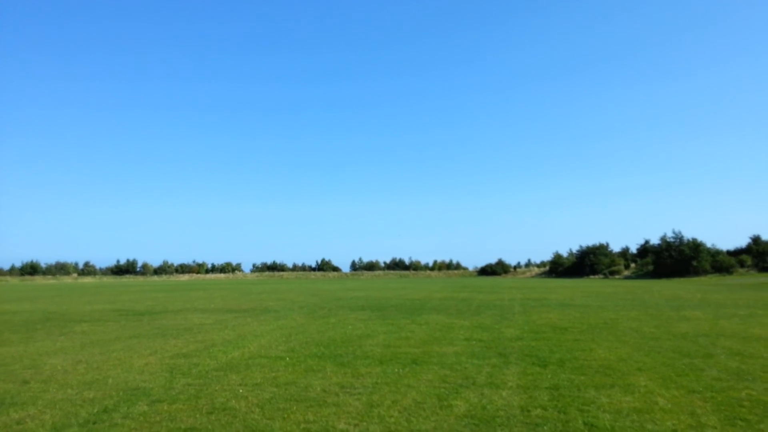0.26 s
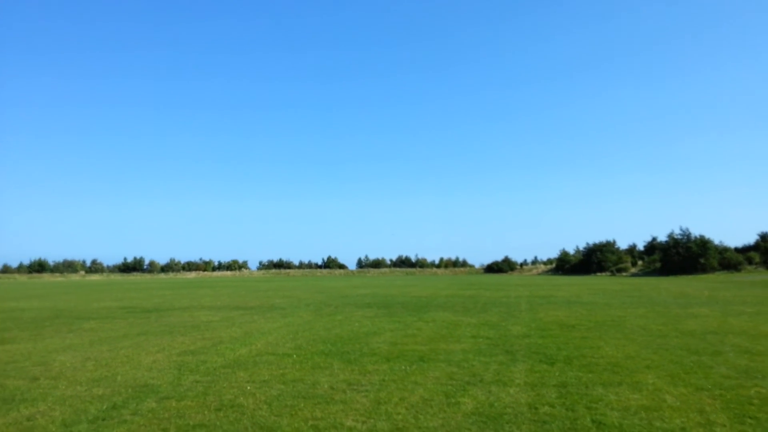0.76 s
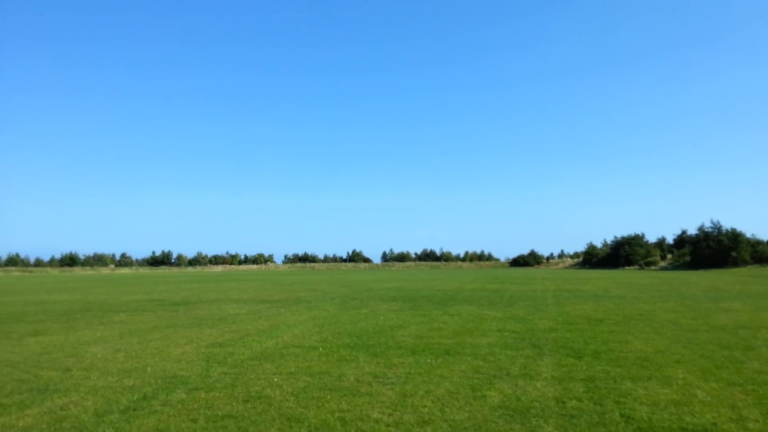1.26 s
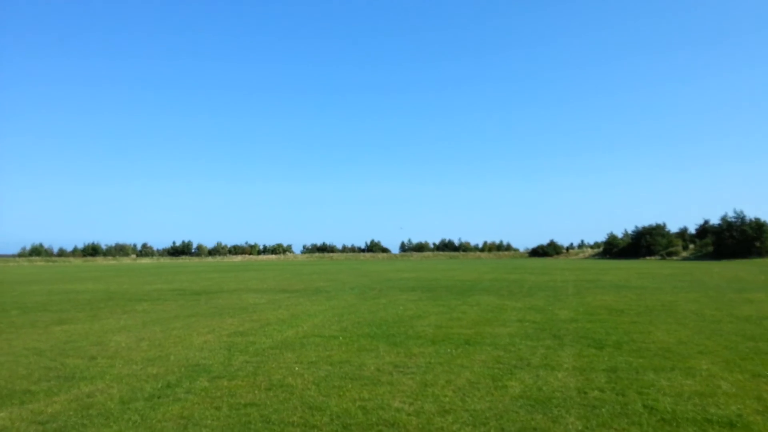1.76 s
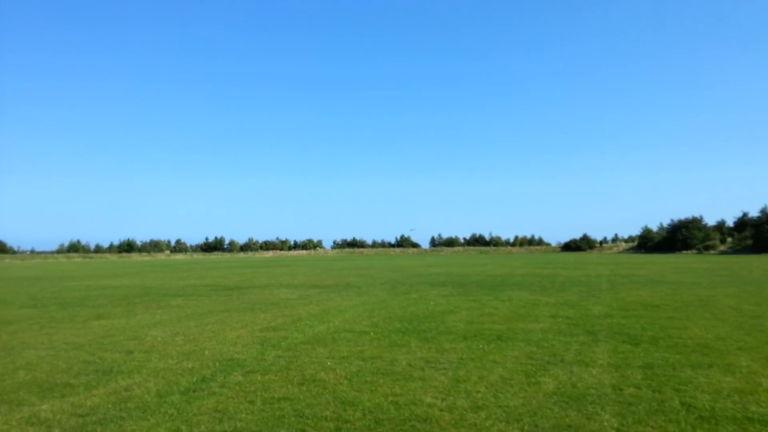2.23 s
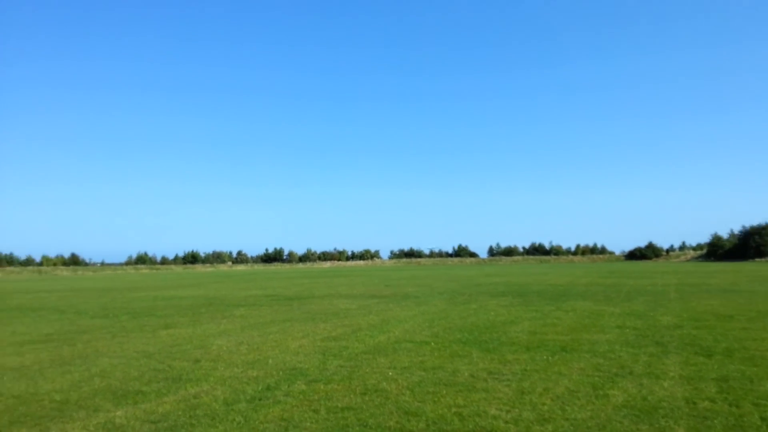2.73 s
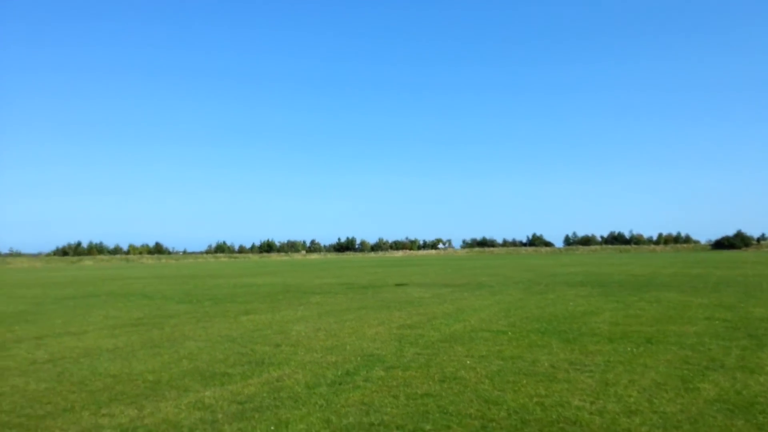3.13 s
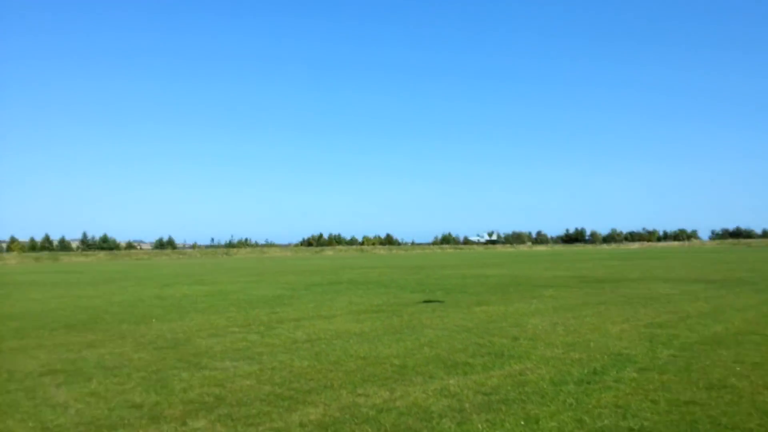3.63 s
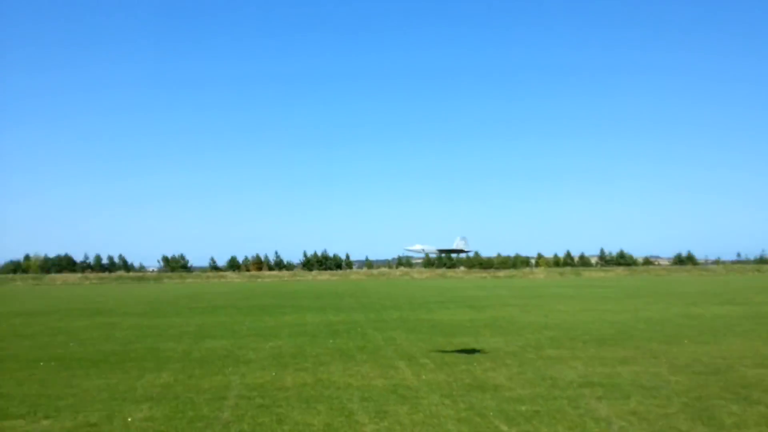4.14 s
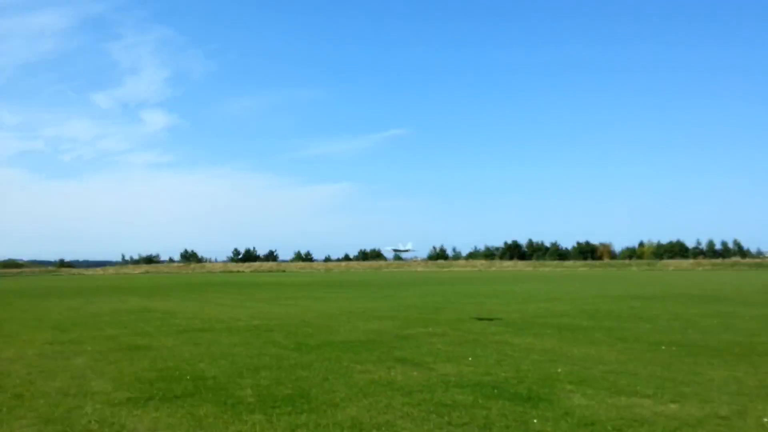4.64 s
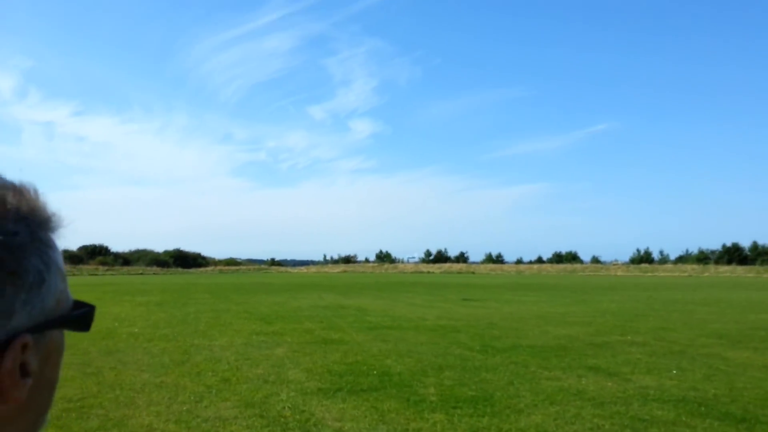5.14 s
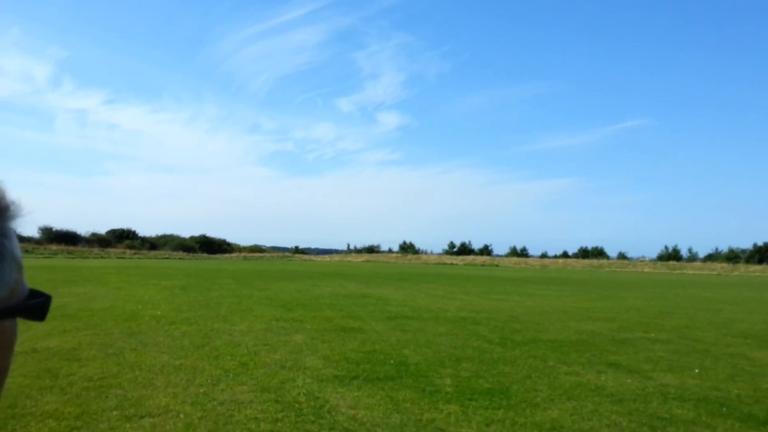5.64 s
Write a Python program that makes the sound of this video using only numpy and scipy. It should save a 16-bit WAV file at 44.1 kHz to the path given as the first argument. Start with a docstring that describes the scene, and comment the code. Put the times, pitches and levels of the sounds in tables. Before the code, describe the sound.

A small ducted-fan jet whines in over an open field, rushes by with airy roar, and departs, beneath buffeting wind.

```python
"""At first gusts slap the two ports of a camera microphone, each by itself, while a breeze blows over a field.
A model jet with an electric ducted fan flies in: the pitch of its whine eases down, then climbs in throttle steps.
It passes low over the grass at about 4.3 s; sines make its whine, coloured noise its intake rush, roar and hiss.
The echo off the ground sweeps a comb of peaks and dips through that noise.
As the jet leaves, its Doppler shift pulls the pitch down and the rumble grows against the wind on the ports."""
import sys
import numpy as np
from scipy import signal
from scipy.fft import rfft, irfft, next_fast_len
from scipy.io import wavfile
from scipy.ndimage import uniform_filter1d

SR = 44100
rng = np.random.default_rng(int(sys.argv[2]) if len(sys.argv) > 2 else 0)


def waveform_to_disk(signal):
    """Save audio, clipped to [-1, 1], as 16-bit WAV at the path in sys.argv[1]."""
    frames = np.transpose(np.atleast_2d(signal))
    scaled = np.clip(frames, -1, 1) * 32767
    samples = np.round(scaled).astype(np.int16)
    wavfile.write(sys.argv[1], SR, samples)


N = 259616

# time of every sample and of every noise frame (s), and the frequencies within a frame
T = np.arange(N) / SR
FRAME_T = np.arange(N // 128 + 5) * 128 / SR
BIN_HZ = np.fft.rfftfreq(512, 1 / SR)[:, None]

# straight pass at steady speed: speed, distance and time of the closest point
SPEED_M_PER_S, CLOSEST_M, CLOSEST_S = 36.65, 19.35, 4.339
SOUND_M_PER_S, MIC_HEIGHT_M = 343, 1.6

# direction of the jet as the camera follows it: (t/s, lag of the left port/ms)
JET_BEARING = [(0, -0.025), (2.2, -0.031), (3.2, -0.039), (3.55, -0.078), (3.97, -0.11), (4.3, -0.048),
               (4.6, -0.036), (4.85, -0.044), (5.2, -0.038), (5.4, 0.0049), (5.89, 0.017)]


def gain_of(db):
    """Turns decibels into a factor."""
    return 10 ** (np.asarray(db) / 20)


def evened(x):
    """Scales a signal to an rms of 1."""
    return x / np.sqrt(np.mean(x ** 2) + 1e-20)


def follow(rows, at, axis=1):
    """Reads one column of a table, joined by straight lines."""
    rows = np.array(rows)
    return np.interp(at, rows[:, 0], rows[:, axis])


def read(points, hz):
    """Reads a spectrum, joined by straight lines on a log-frequency axis."""
    f, value = np.transpose(points)
    return np.interp(np.log(hz + 1), np.log(f), value)


def coloured(x, spectrum):
    """Gives a signal a spectrum, at rms 1."""
    hz = np.fft.rfftfreq(len(x), 1 / SR)
    return evened(irfft(rfft(x) * gain_of(read(spectrum, hz)), len(x)))


def wobble(rate_hz):
    """Random drift of rms 1, up to about the given rate."""
    size = next_fast_len(N)
    hz = np.fft.rfftfreq(size, 1 / SR)
    drift = irfft(rfft(rng.standard_normal(size)) / (1 + (hz / rate_hz) ** 2), size)
    return evened(drift[:N])


def field(level_db=-50.5, shared=0.15):
    """Steady breeze in grass and far trees, with microphone hiss: noise partly the same at both ports."""
    # colour of breeze and hiss together: (f/Hz, level/dB)
    breeze_colour = [(20, -30), (80, -25), (150, -8), (300, 7.5), (800, 8), (1400, 2.5), (2200, -6),
                     (5000, -2.5), (6500, -13), (14500, -16.5)]
    common, *own = [coloured(rng.standard_normal(N), breeze_colour) for _ in range(3)]
    return gain_of(level_db) * evened(shared * common + np.array(own) * .5)


def gusts():
    """Strength of the wind on each port: every gust rises, holds and dies."""
    # gusts over one port, before the shared boost in wind(): (t/s, length/s, level/dB, port 0 left or 1 right)
    gust_list = [(0.028, 0.07, -36, 0), (0.176, 0.16, -36.5, 0), (0.39, 0.046, -34.5, 0),
                 (.47, 0.083, -47, 0), (0.548, 0.097, -40, 0), (0.68, 0.18, -36.5, 0),
                 (0.883, 0.049, -41, 0), (0.961, 0.028, -37.5, 0), (1.008, 0.34, -36, 0),
                 (1.321, 0.015, -35.5, 1), (1.394, 0.09, -38, 0), (1.538, 0.023, -41.5, 1),
                 (1.655, 0.0093, -38.5, 1), (1.77, 0.04, -44.5, 1), (1.877, 0.011, -46, 1),
                 (2.024, 0.014, -40.5, 0), (1.964, 0.15, -46, 1), (2.189, 0.12, -34.5, 0),
                 (2.435, 0.13, -41, 0), (2.475, 0.019, -42, 1), (2.649, 0.087, -42, 0),
                 (2.762, 0.11, -37, 0), (2.93, 0.11, -41.5, 1), (2.972, 0.082, -40.5, 0),
                 (3.122, 0.021, -48, 1), (3.19, 0.15, -59, 0), (3.55, .06, -72, 0), (3.995, 0.019, -37, 1),
                 (4.016, 0.094, -41, 0), (4.194, 0.11, -39, 1), (4.272, 0.052, -42, 0),
                 (4.382, 0.047, -40, 1), (4.418, 0.27, -45.5, 0), (4.744, 0.083, -40.5, 0),
                 (4.855, 0.059, -41, 0), (4.936, 0.077, -47, 0), (5.43, 0.09, -57, 0),
                 (5.616, 0.014, -47, 0), (5.726, 0.027, -54, 0), (5.82, 0.044, -51.5, 0)]
    rise_s, fall_s, lull_db = 0.017, 0.013, -85  # the lull is the wind between gusts
    strength = np.full((2, N), gain_of(lull_db))
    for s, length, db, port in gust_list:
        outside = np.maximum(s - T, 0) / rise_s + np.maximum(T - s - length, 0) / fall_s
        strength[round(port)] += gain_of(db) * np.exp(-outside)
    return strength


def wind(gust_db=3.0, lumpy_db=2.5, crackle_db=3.0, buffet_db=0.0, slap=0.68):
    """Lumpy air noise on each port; a hard eddy is a pressure slap in a short flurry, with its own pitch."""
    # colour of wind on a port, thin in the bass: (f/Hz, level/dB)
    wind_colour = [(20, -48), (70, -50), (100, -47), (140, -27), (200, -13.5), (290, 1), (450, 2.5),
                   (620, -3), (850, -13), (1200, -29.5), (2000, -44), (5000, -64)]
    wind_centre_hz = 457.5
    # colour of the deep rumble under the gusts: (f/Hz, level/dB)
    rumble_colour = [(20, -18), (60, -28), (110, -14), (170, -0.5), (240, 5), (400, -18), (1000, -70)]
    # rumble against the gusts, growing as the camera turns after the jet: (t/s, level/dB)
    rumble_share = [(0, -21), (.7, -24), (2.6, -22), (3.2, -11), (4.2, -15), (4.8, -10.5), (5.7, -3.5)]
    # single hard eddies that strike a port: (t/s, level/dB, length/s, centre f/Hz, port 0 left or 1 right)
    buffets = [(0.004, -26.5, 0.0072, 440, 0), (0.014, -20, 0.0041, 486, 0), (0.055, -22, 0.0062, 580, 0),
               (0.062, -12, 0.0044, 524, 0), (0.077, -14, 0.0064, 490, 0), (0.085, -16.5, 0.0054, 590, 0),
               (0.09, -19, 0.0062, 520, 0), (0.118, -18, 0.0053, 416, 1), (0.144, -27, 0.0049, 480, 1),
               (0.177, -19.5, 0.0022, 507, 0), (0.187, -32, 0.0042, 487, 0), (0.204, -20.5, 0.0036, 465, 0),
               (0.229, -34, 0.003, 430, 0), (0.252, -30, 0.0051, 490, 0), (0.279, -20.5, 0.0048, 490, 0),
               (0.306, -34, 0.0047, 430, 0), (0.322, -27, 0.0021, 463, 0), (0.42, -23.5, 0.0027, 470, 0),
               (0.526, -22.5, 0.0034, 467, 0), (0.578, -27, 0.0052, 503, 0), (0.599, -24, 0.003, 520, 0),
               (0.61, -23.5, 0.004, 436, 0), (0.634, -25, 0.0024, 420, 0), (0.654, -31, 0.003, 430, 0),
               (0.694, -24.5, 0.0072, 476, 1), (0.709, -28, 0.0077, 472, 0), (0.76, -26, 0.0075, 463, 0),
               (0.791, -28, 0.0027, 500, 0), (0.838, -23.5, 0.0023, 403, 0), (0.868, -37, 0.0062, 438, 0),
               (0.878, -23.5, 0.0034, 460, 0), (0.969, -27.5, 0.0044, 460, 0), (1.031, -28, 0.011, 435, 0),
               (1.049, -19, 0.0012, 566, 0), (1.065, -21, 0.0043, 510, 0), (1.072, -31, 0.0038, 424, 0),
               (1.092, -22, 0.0029, 584, 0), (1.116, -21, 0.0086, 487, 1), (1.137, -26.5, 0.0098, 443, 0),
               (1.159, -17.5, 0.0014, 540, 0), (1.196, -24, 0.0022, 494, 0), (1.21, -23, 0.003, 473, 0),
               (1.249, -25, 0.0033, 514, 0), (1.276, -18.5, 0.0035, 407, 0), (1.288, -12.5, 0.0015, 550, 0),
               (1.329, -23.5, 0.007, 485, 0), (1.342, -27, 0.003, 480, 0), (1.382, -32, 0.0028, 430, 0),
               (1.4, -23, 0.0029, 430, 0), (1.41, -16, 0.004, 580, 0), (1.447, -24.5, 0.003, 450, 0),
               (1.48, -27.5, 0.0065, 464, 0), (1.557, -27, 0.012, 493, 1), (1.671, -25, 0.0029, 535, 1),
               (1.884, -18, 0.003, 525, 1), (2.034, -27, 0.0074, 427, 1), (2.197, -20.5, 0.0038, 464, 0),
               (2.255, -28, 0.003, 500, 0), (2.293, -22.5, 0.0034, 540, 0), (2.675, -15, 0.002, 476, 0),
               (2.78, -26.5, 0.0024, 500, 0), (2.815, -23, 0.0034, 470, 0), (2.843, -27, 0.0097, 550, 0),
               (2.956, -22, 0.004, 445, 1), (3.018, -28, 0.005, 450, 0), (3.036, -27, 0.004, 480, 0),
               (3.973, -24.5, 0.003, 426, 1), (4.003, -37, 0.0088, 510, 1), (4.043, -29, 0.0041, 517, 0),
               (4.051, -27, 0.0035, 530, 0), (4.089, -30, 0.0025, 427, 0), (4.198, -25.5, 0.0041, 450, 1),
               (4.259, -28, 0.0045, 440, 1), (4.281, -33, 0.0032, 570, 0), (4.297, -34, 0.0031, 600, 0),
               (4.395, -39, 0.0038, 437, 1), (4.457, -21, 0.0023, 557, 0), (4.567, -29, 0.0037, 590, 0),
               (4.795, -22, 0.003, 457, 0), (4.836, -26.5, 0.0027, 413, 0), (5.006, -38, 0.0047, 430, 0)]

    push = []
    for gust in gusts():
        lumps = gain_of(lumpy_db * wobble(95) + crackle_db * wobble(330))
        push.append(gain_of(gust_db) * gust * evened(rng.standard_normal(N) * lumps))
    depth = gain_of(follow(rumble_share, T))
    out = np.array([np.std(port) * (coloured(port, wind_colour) + depth * coloured(port, rumble_colour))
                    for port in push])
    for s, db, length, centre_hz, port in buffets:
        start = max(round(s * SR) - 2048, 0)
        t = T[start:][:4096] - s  # time from the middle of the eddy
        window = np.exp(-(t / length) ** 2 * np.pi / 2)
        colour = [(hz * centre_hz / wind_centre_hz, level) for hz, level in wind_colour]
        flurry = coloured(window * rng.standard_normal(len(t)), colour)
        spike = coloured(np.sinc(t * SR), colour)
        eddy = evened(flurry + slap * rng.choice([-1, 1]) * spike)  # the slap pushes or pulls
        eddy *= np.sqrt(np.mean(window ** 2))  # a short eddy carries less energy
        out[round(port), start:start + len(t)] += gain_of(db + buffet_db) * eddy
    return out


def distance(t):
    """Metres from the jet to the camera, on a straight path."""
    return np.hypot(SPEED_M_PER_S * (t - CLOSEST_S), CLOSEST_M)


def spreading_db(t):
    """Loss as sound spreads over distance, relative to the closest point."""
    return 20 * np.log10(CLOSEST_M / distance(t))


def fan_hz(t):
    """Blade-passing pitch on board: the fan spools toward each new throttle setting."""
    # moves of the throttle stick: (t/s, new blade-passing f/Hz)
    throttle_moves = [(.475, 2980), (.75, 2963), (1.3, 2954), (1.883, 3160), (2.446, 3345), (2.549, 3508),
                      (3.124, 3855), (3.26, 3896), (3.665, 4047), (3.8, 4094), (3.881, 4167), (3.939, 4372),
                      (4.305, 4526), (4.413, 4712), (4.535, 5016), (4.843, 5325), (5.012, 5482),
                      (5.122, 5725)]
    start_hz, spool_s = 3234, .045  # first pitch, and how quickly the fan settles on a setting
    hz, before = start_hz, start_hz
    for s, setting in throttle_moves:
        hz = hz + (setting - before) * (1 - np.exp(-np.maximum(t - s, 0) / spool_s))
        before = setting
    return hz


def heard_hz(t):
    """Blade-passing pitch at the camera: Doppler shift raises it on approach and lowers it after."""
    receding = SPEED_M_PER_S ** 2 * (t - CLOSEST_S) / distance(t)
    return fan_hz(t) / (1 + receding / SOUND_M_PER_S)


def whistle():
    """A thin motor tone at one throttle setting: a sine that sinks as the throttle rises."""
    # pitch and level of the whistle: (t/s, f/Hz, level/dB)
    whistle_path = [(2.55, 1820, -73), (2.6, 1750, -52), (2.68, 1678, -51.5), (2.87, 1655, -53),
                    (2.97, 1626, -52.5), (3.11, 1630, -51), (3.15, 1423, -69), (3.18, 1410, -75)]
    turn = 2 * np.pi * np.cumsum(follow(whistle_path, T) + 2.2 * wobble(40)) / SR
    sounding = (T > whistle_path[0][0]) & (T < whistle_path[-1][0])
    level_db = follow(whistle_path, T, axis=2) + 0.61 * wobble(24.7)
    return np.sqrt(2) * sounding * gain_of(level_db) * np.sin(turn)


def ground_comb():
    """Direct sound plus its late echo off the grass: some frequencies add up, others cancel."""
    # height of the jet, diving to the grass and easing up again: (t/s, height/m)
    jet_height = [(0, 8.4), (1.7, 5.2), (2.1, 3.54), (2.5, 2.78), (2.85, 2.59), (3.33, 1.75), (3.48, 1.82),
                  (3.6, 2.26), (3.78, 2.63), (4.15, 3.68), (4.3, 3.76), (4.6, 3.2), (4.8, 3.0),
                  (4.96, 3.03), (5.15, 3.12), (5.32, 3.02), (5.47, 3.01), (5.63, 2.83), (5.89, 3.35)]
    # the echo is inverted when it grazes the grass, nearly upright when steeper: (rise over run, phase lag/rad)
    echo_phase = [(.06, 3.05), (.11, 2.16), (.16, 1.54), (.21, 1.45), (.27, .38)]
    # strength of the ground echo, before the factor below: (f/Hz, share)
    grass_echo = [(200, .38), (1000, .36), (2300, .57), (4500, .42), (8000, .22), (14000, .06)]
    # how cleanly the ground mirrors the jet's noise: (t/s, factor)
    mirror_factor = [(0, .8), (2.2, 1.05), (3.1, 1.15), (3.6, .68), (4.0, .4), (4.3, 1.0), (4.6, 1.2),
                     (4.9, 1.15), (5.3, 1.4), (5.6, 1.0), (5.89, 1.25)]

    height, metres = follow(jet_height, FRAME_T), distance(FRAME_T)
    echo_s = 2 * MIC_HEIGHT_M * height / metres / SOUND_M_PER_S
    lag = follow(echo_phase, (height + MIC_HEIGHT_M) / metres)
    echo = np.clip(read(grass_echo, BIN_HZ) * follow(mirror_factor, FRAME_T), 0, .9)
    return abs(1 + echo * np.exp(-1j * (2 * np.pi * BIN_HZ * echo_s + lag)))


def airflow(patchy_db=1.25, flicker_db=0.5, rush_follow=0.39, low_cut_hz=230):
    """Exhaust roar, fan rush and jet hiss: shaped noise combed by the ground echo, heard at two ports."""
    # air noise as at the closest distance; the duct beams the rush fore and aft, so it dips abeam:
    # (t/s, rush level/dB, hiss level/dB)
    air_levels = [(0, -37, -33), (1, -31, -47), (1.7, -33, -41.5), (2.05, -34.5, -48.5),
                  (2.56, -29.5, -37.5), (2.82, -30, -42), (3.06, -27.5, -36), (3.38, -28, -41.5),
                  (3.63, -33, -41.5), (3.93, -33, -36.5), (4.25, -37.5, -44), (4.6, -31.5, -38),
                  (4.85, -28, -38.5), (5.3, -27, -33), (5.48, -28, -33), (5.58, -29.5, -36.5),
                  (5.7, -29, -31.5), (5.89, -32, -37.5)]
    # centre of the exhaust's hollow resonance: (t/s, f/Hz)
    duct_centre = [(0, 1335), (3.1, 1370), (3.7, 1263), (4.12, 1250), (4.5, 1190), (4.85, 1160),
                   (5.4, 1225), (5.89, 1300)]
    # colour of the roar around that centre: (f from the centre/Hz, level/dB)
    roar_colour = [(-1150, -39), (-950, -39), (-550, 2), (-300, -10), (-130, 1), (-47, 9), (27, 6.5),
                   (133, -6), (337, 0), (541, -4.5), (802, 5.5), (1154, -1), (1584, 2.5), (2400, -30),
                   (4000, -71)]
    # share of the roar beamed toward the camera as the jet turns past it: (t/s, level/dB)
    roar_beam = [(0, 3.5), (1.3, 2), (1.9, 1), (2.6, -0.5), (3.3, 1.5), (3.55, 2.5), (3.75, 5), (3.88, 2),
                 (4.1, 3.5), (4.3, 2), (4.55, 1.5), (4.72, -0.5), (4.92, 0.5), (5.12, 0.5), (5.32, 0.5),
                 (5.89, -2.5)]
    # the roar's upper band, beamed aft: (t/s, level/dB)
    upper_beam = [(0, -2), (2.5, 1), (3.25, -1), (3.6, 0), (3.9, -5), (4.15, 0), (4.55, 3), (5, 0),
                  (5.4, 0.5), (5.89, 1)]
    # colour of the fan rush at mid throttle: (f/Hz, level/dB)
    rush_colour = [(900, -23.5), (2200, -6), (3000, -3), (3600, 2.5), (4200, 2), (4700, 0), (5150, -7),
                   (5700, -17), (6500, -18), (8500, -50)]
    # colour of the jet's hiss: (f/Hz, level/dB)
    hiss_colour = [(2000, -24.5), (5000, 8.5), (6500, 0), (8000, -1.5), (10000, -2), (11500, -8),
                   (13500, -9), (15000, -18.5)]
    # top treble of the hiss, beamed ahead and to the side and lost over distance: (t/s, level at 10 kHz/dB)
    treble_sheen = [(0, 10.5), (2.4, -7), (2.8, -5), (3.05, -2.5), (3.5, 2), (3.95, -2), (4.3, 0.5),
                    (4.65, -1.5), (5, -6), (5.3, -14), (5.89, -11)]
    # likeness of the noise at the two ports: (f/Hz, likeness 0-1)
    port_likeness = [(200, 1), (3000, 0.86), (6000, 0.76), (10000, 0.28), (14000, 0.04)]
    rush_pitch_hz = 4400  # blade-passing pitch at mid throttle
    roar_mid_db, roar_db_per_octave = -36.5, 15  # roar at that pitch, and its growth with fan speed
    upper_hz, upper_width_hz = 2170, 410

    stretch = (heard_hz(FRAME_T) / rush_pitch_hz) ** rush_follow  # the rush climbs with the heard pitch
    sheen_db = follow(treble_sheen, FRAME_T) * (BIN_HZ / 10000) ** 2
    octaves = np.log2(fan_hz(FRAME_T) / rush_pitch_hz)
    roar_db = roar_mid_db + roar_db_per_octave * octaves + follow(roar_beam, FRAME_T)
    upper_db = follow(upper_beam, FRAME_T) * np.exp(-((BIN_HZ - upper_hz) / upper_width_hz) ** 2)
    roar_shape_db = follow(roar_colour, BIN_HZ - follow(duct_centre, FRAME_T)) + upper_db
    layers = [(roar_shape_db, roar_db),
              (read(rush_colour, BIN_HZ / stretch), follow(air_levels, FRAME_T)),
              (read(hiss_colour, BIN_HZ) + sheen_db, follow(air_levels, FRAME_T, axis=2))]
    comb = ground_comb()
    power = 0
    for shape_db, level_db in layers:
        shape = (comb * gain_of(shape_db)) ** 2
        power = power + shape / shape.sum(0) * gain_of(level_db + spreading_db(FRAME_T)) ** 2

    # noise for two ports; blurred noise makes it patchy in time and frequency
    a, b, c, d, patches = rng.standard_normal((5,) + power.shape)
    patches = uniform_filter1d(uniform_filter1d(patches, size=9, axis=0), size=14, axis=1)
    patches = evened(patches)
    flicker = np.interp(FRAME_T, T, wobble(32))
    same = np.clip(read(port_likeness, BIN_HZ), 0, 1)
    right = a + 1j * b
    left = same * right + np.sqrt(1 - same ** 2) * (c + 1j * d)
    bearing_s = follow(JET_BEARING, FRAME_T) * 1e-3
    left = left * np.exp(-2j * np.pi * BIN_HZ * bearing_s)
    frames = np.array([left, right]) * np.sqrt(power) * gain_of(patchy_db * patches + flicker_db * flicker)
    sound = signal.istft(frames, nperseg=512, noverlap=384)[1][:, :N]
    sound = signal.sosfilt(signal.butter(4, low_cut_hz, "high", fs=SR, output="sos"), sound)
    # overall level from the layers; the right port is 1 dB stronger
    return evened(sound) * np.sqrt(power.sum(0).mean()) * gain_of([[-.5], [.5]])


def whine(flutter_db=1.0, jitter_hz=5.13, hum_waver_db=1.5):
    """Blade tone, two harmonics and rotor hum as sines; turbulence shakes them, most near and behind the jet."""
    # whine toward the camera, as at the closest distance:
    # (t/s, level/dB, octave level/dB, third harmonic level/dB, left minus right/dB)
    whine_levels = [(0, -29.5, -55, -60, 0), (.4, -26.5, -51, -64, 1), (.65, -33.5, -58, -76, -4),
                    (.9, -29, -59, -68, -7.5), (1.86, -30, -65, -70, -4.5), (1.95, -21.5, -56, -68, 0),
                    (2.4, -21.5, -48, -58, -2), (2.53, -19, -36.5, -62, -2), (2.67, -26.5, -53, -73, -3),
                    (3.02, -27.5, -47, -48, -6), (3.34, -27.5, -36, -56, 7), (3.68, -38, -47.5, -58, -2),
                    (4.05, -24.5, -50, -57, 2.5), (4.45, -26.5, -46, -58, 2.5), (4.8, -35, -45, -48, -1),
                    (5.15, -39, -45, -62, 1), (5.31, -26.5, -49.5, -60, -2), (5.39, -28, -43.5, -62, -2),
                    (5.89, -34.5, -50.5, -66, 7)]
    # hum of the slightly unbalanced rotor: (t/s, level/dB)
    shaft_hum = [(0, -80), (3.9, -70), (4.45, -53), (4.8, -62), (5.1, -68), (5.2, -53.5), (5.55, -54.5),
                 (5.89, -59)]
    # smearing of the whine, strong when heard through the jet's wake: (t/s, phase scatter of the blade tone/rad)
    wake_smear = [(0, 0.069), (2.4, 0.0075), (3.2, 0.081), (4.1, 0.18), (4.45, 0.054), (4.7, 0.26),
                  (5.15, 0.21), (5.35, 0.21), (5.89, 0.14)]
    # brief swells and fades of the blade tone in the moving air: (t/s, length/s, left level/dB, right level/dB)
    swell_list = [(3.064, 0.012, 5, 4), (3.155, 0.014, 8, 5), (3.267, 0.006, 3, 8), (3.287, .007, -7, -7),
                  (3.327, 0.05, 1.5, 9), (3.494, 0.035, -13, -11), (3.598, 0.077, 9, 10),
                  (3.788, 0.014, 6, 2), (3.896, 0.065, -1.5, 5.5), (4.057, 0.063, -14, -10.5),
                  (4.133, 0.01, -14, -14), (4.17, .018, -1.5, -5), (4.203, 0.013, 3.5, 3),
                  (4.219, 0.0093, -30, -10), (4.253, 0.0073, -16, -16), (4.285, 0.014, -0.5, 2),
                  (4.301, 0.0064, -5, -8), (4.368, 0.024, 7.5, 6.5), (4.405, 0.013, -1.5, -11),
                  (4.43, 0.007, -5, -15), (4.541, 0.017, 5, 5.5), (4.59, 0.03, -7, 0),
                  (4.645, 0.0083, -14, -14), (4.727, 0.0068, -7, -5), (4.785, 0.022, -6, -4),
                  (4.82, 0.0081, 8, 12), (4.847, .015, -2, 0), (4.89, 0.015, -1, -5), (5.053, .02, -1, -5),
                  (4.96, 0.06, 7, 6), (5.125, .035, 6, -14), (5.53, 0.1, -0.5, -23), (5.7, 0.043, 1, 8),
                  (5.862, 0.055, 4, 4)]
    blade_count = 10
    wake_flutter_db, wake_fading_db = 8, 2  # quick flutter and slow fading per radian of wake

    near, wake = CLOSEST_M / distance(T), follow(wake_smear, T)
    hz = heard_hz(T) + jitter_hz * (0.33 + near) * wobble(50.5)
    turn = 2 * np.pi * np.cumsum(hz) / SR
    left_turn = turn - 2 * np.pi * hz * follow(JET_BEARING, T) * 1e-3  # the left port's lag as phase
    port_turn = np.array([left_turn, turn])
    balance_db = np.array([[.5], [-.5]]) * follow(whine_levels, T, axis=4)
    toward_ports = gain_of(spreading_db(T) + balance_db)
    swell_db = sum(np.array([[left], [right]]) * np.exp(-((T - s) / length) ** 2)
                   for s, length, left, right in swell_list)
    levels = [follow(whine_levels, T) + swell_db,
              follow(whine_levels, T, axis=2), follow(whine_levels, T, axis=3)]

    # the rotor turns once while all its blades pass
    out = gain_of(follow(shaft_hum, T) + hum_waver_db * wobble(22)) * np.sin(port_turn / blade_count)
    for k, db in enumerate(levels, 1):
        scatter = k ** 2.0 * wake * wobble(110)  # short waves are smeared most
        flutter = (flutter_db + wake_flutter_db * wake) * wobble(94)
        flutter += wake_fading_db * wake * wobble(9.3)
        out += toward_ports * gain_of(db + flutter) * np.sin(k * port_turn + scatter)
    return np.sqrt(2) * out


def scene():
    """The jet over the field, and wind on the microphone, added together."""
    return whine() + whistle() + airflow() + field() + wind()


def record(dry):
    """The camera body colours the sound around the ports, and a low-pass filter trims the top treble."""
    # colour of the camera body around the ports: (f/Hz, level/dB)
    body_colour = [(700, -3), (930, -1.5), (1150, 0.5), (2750, -2), (3030, -3.5), (3330, -3), (4950, -0.5),
                   (5500, -1), (6100, 0), (7200, 2.5)]
    edge_hz = 14700
    heard = irfft(rfft(dry) * gain_of(read(body_colour, np.fft.rfftfreq(N, 1 / SR))), N)
    low_pass = signal.firwin(511, edge_hz, window=("kaiser", 9), fs=SR)
    return signal.oaconvolve(heard, low_pass[None], "same")


dry = scene()
out = record(dry)
waveform_to_disk(out)
```